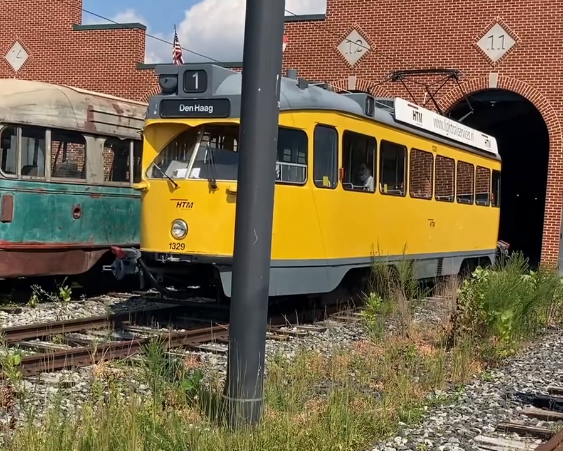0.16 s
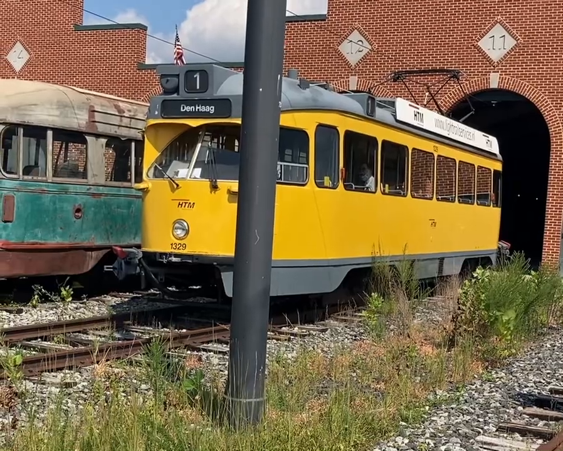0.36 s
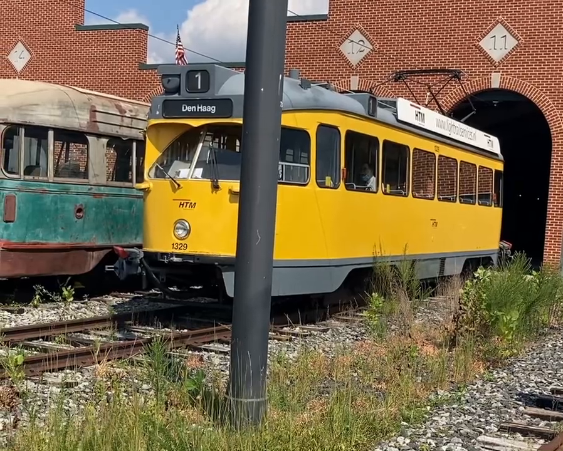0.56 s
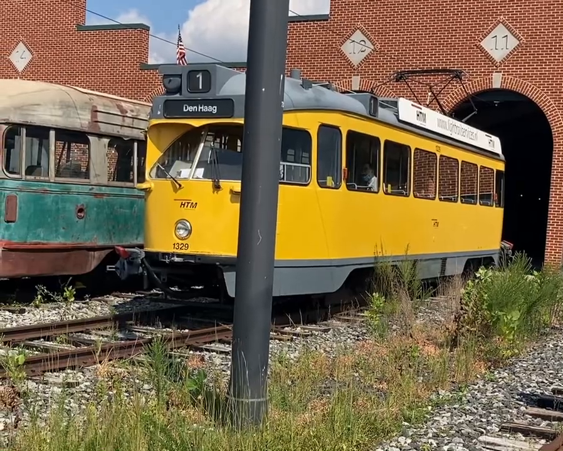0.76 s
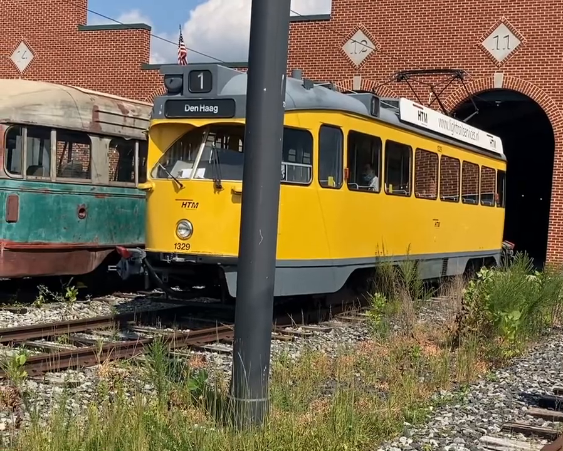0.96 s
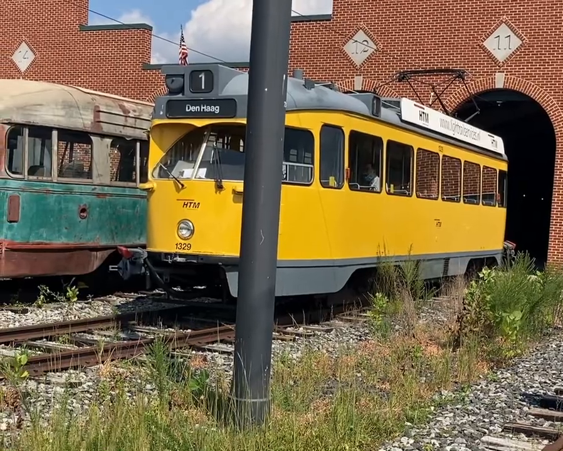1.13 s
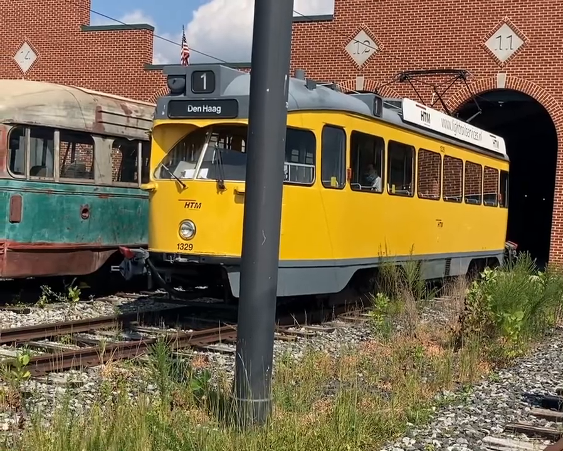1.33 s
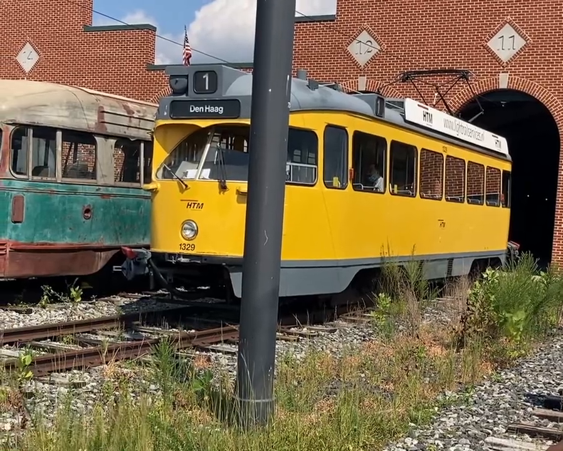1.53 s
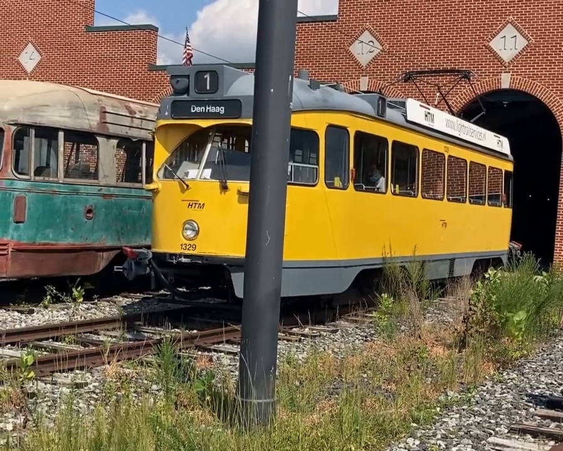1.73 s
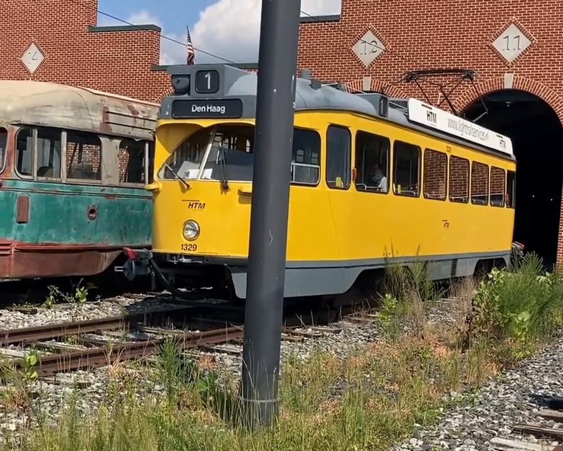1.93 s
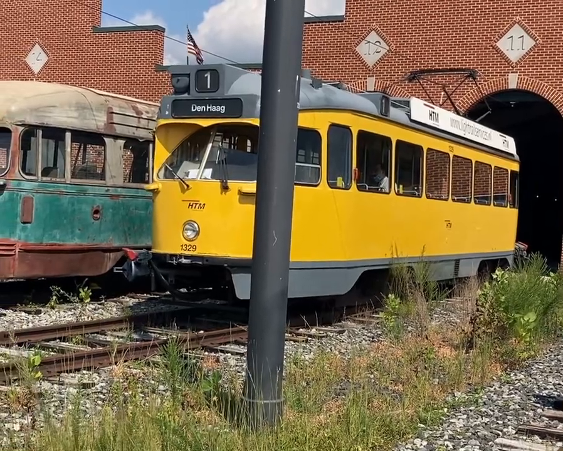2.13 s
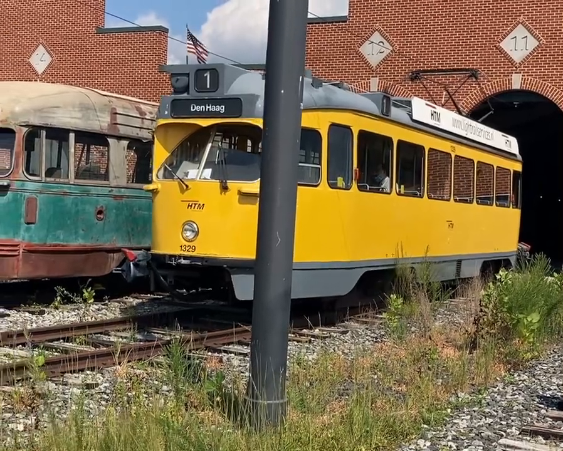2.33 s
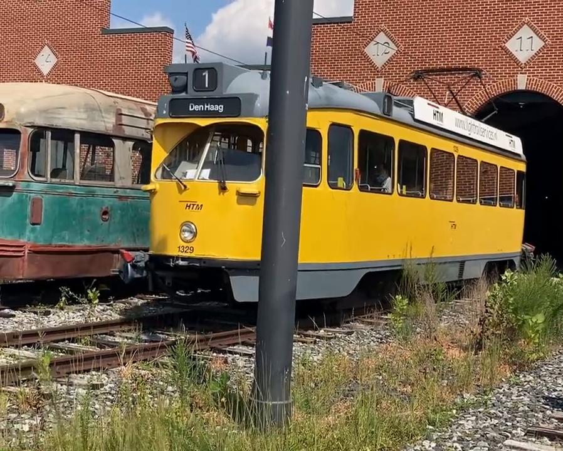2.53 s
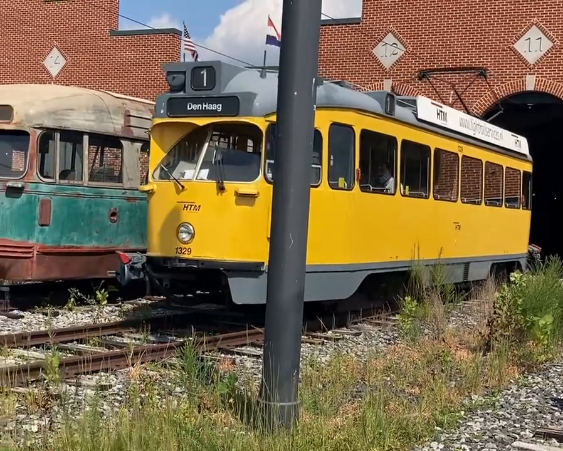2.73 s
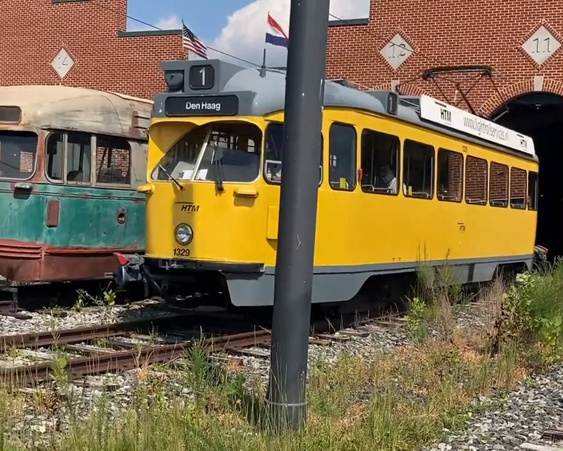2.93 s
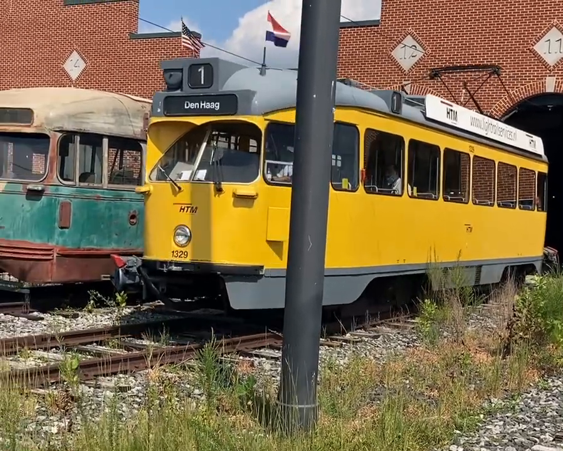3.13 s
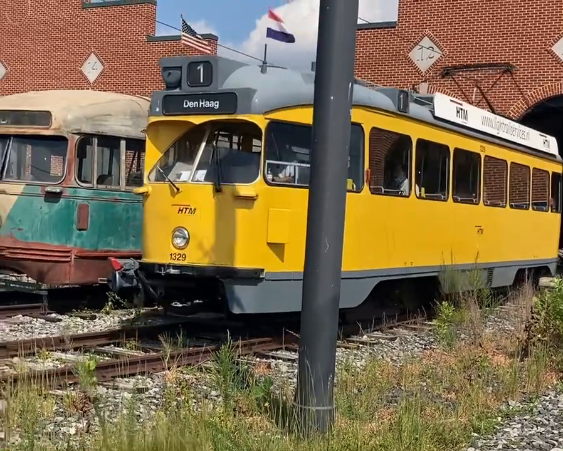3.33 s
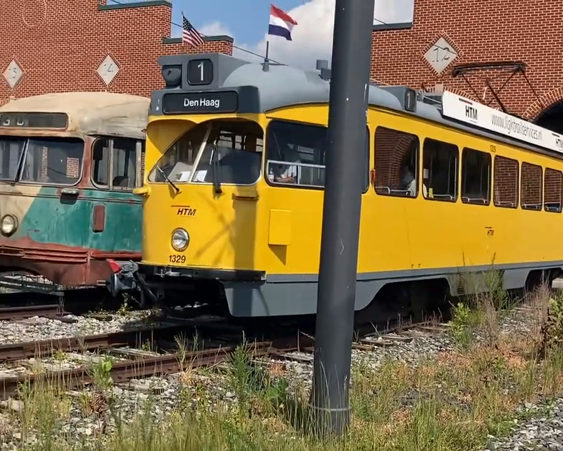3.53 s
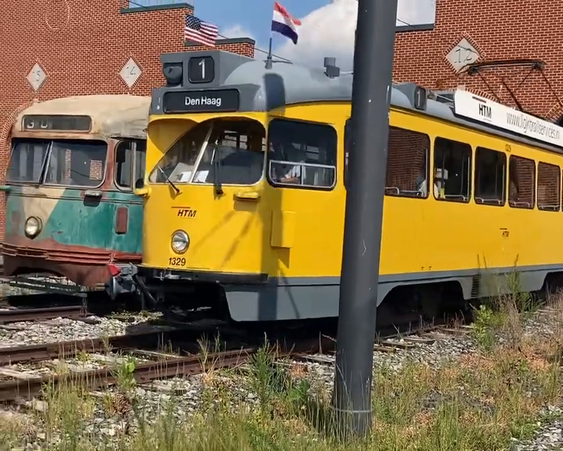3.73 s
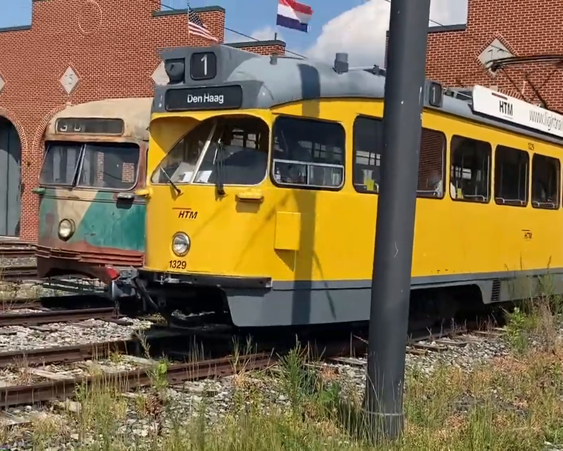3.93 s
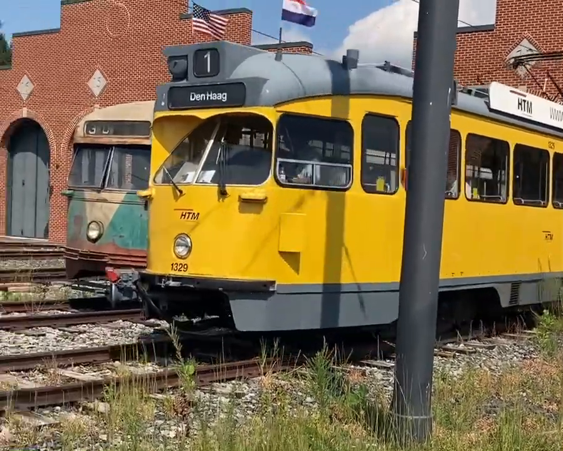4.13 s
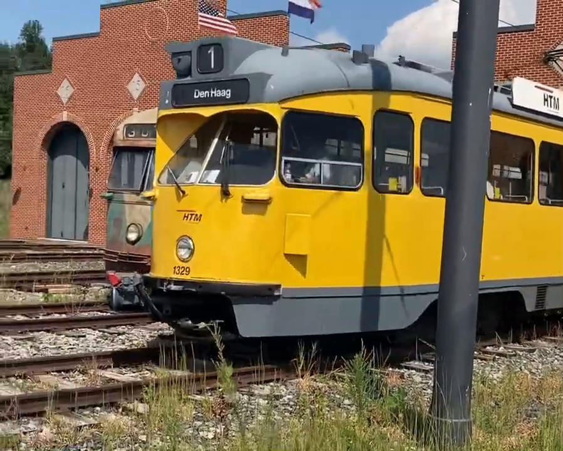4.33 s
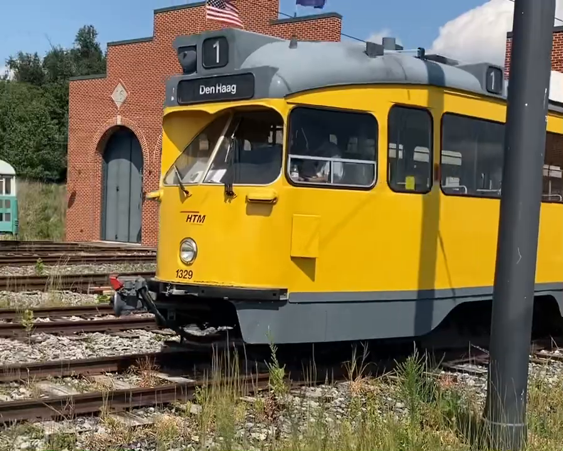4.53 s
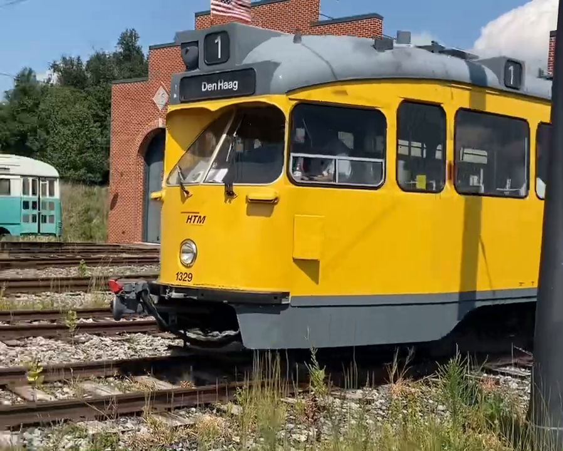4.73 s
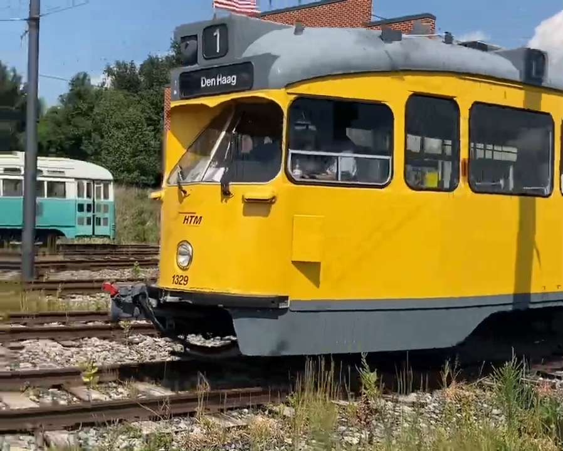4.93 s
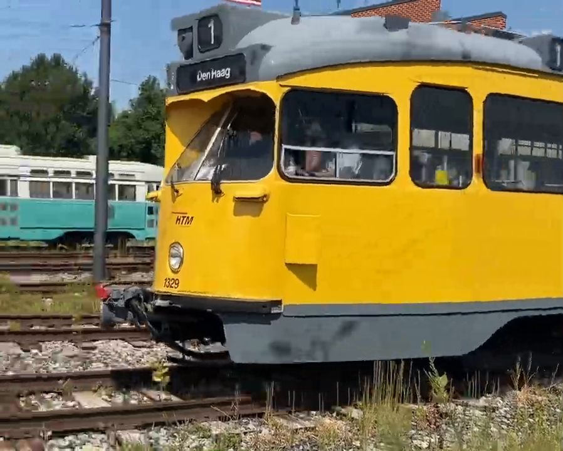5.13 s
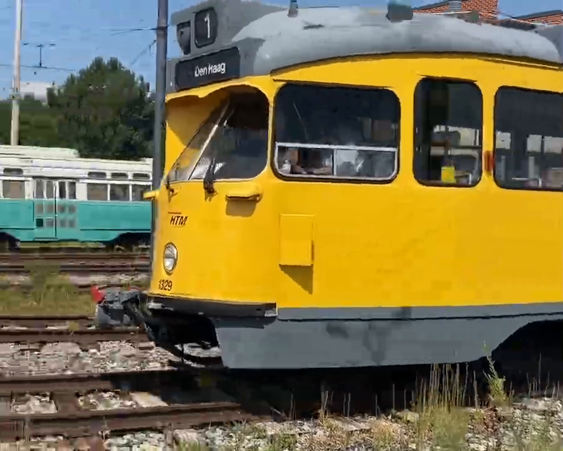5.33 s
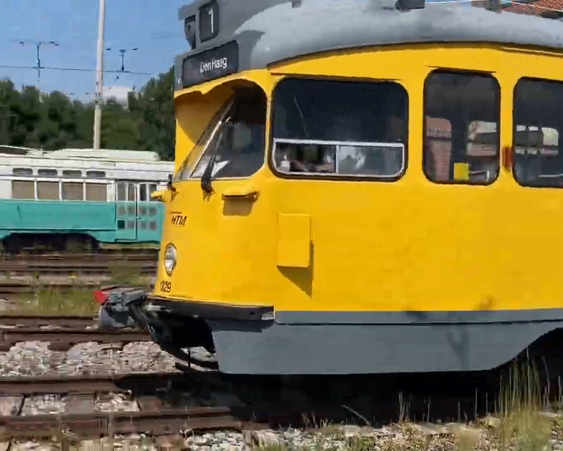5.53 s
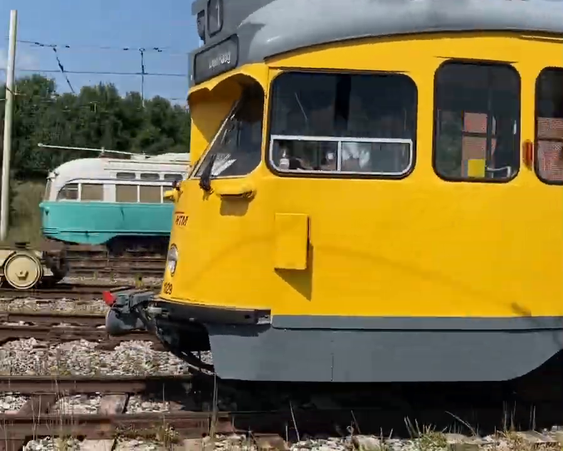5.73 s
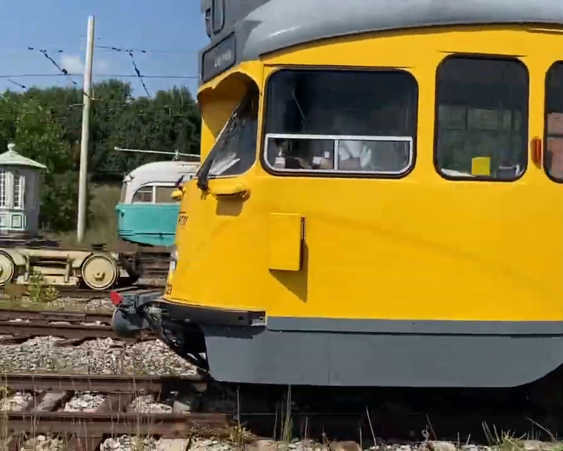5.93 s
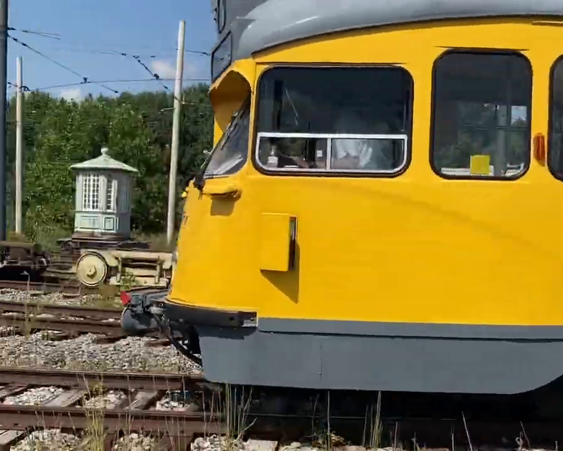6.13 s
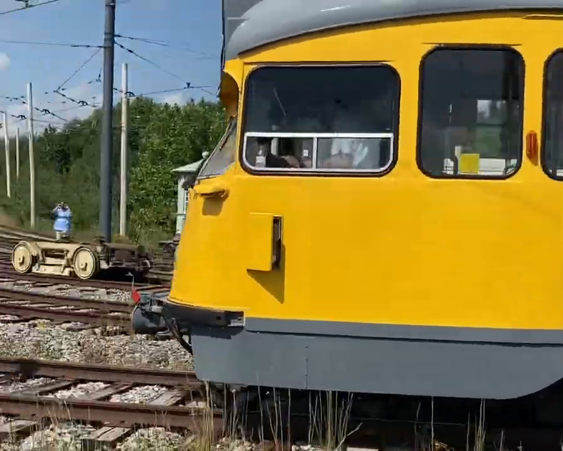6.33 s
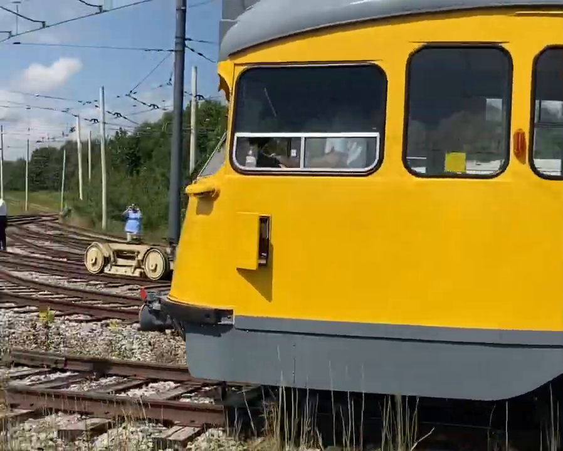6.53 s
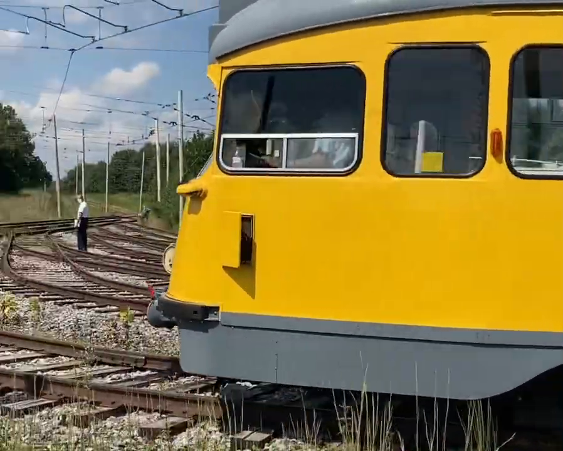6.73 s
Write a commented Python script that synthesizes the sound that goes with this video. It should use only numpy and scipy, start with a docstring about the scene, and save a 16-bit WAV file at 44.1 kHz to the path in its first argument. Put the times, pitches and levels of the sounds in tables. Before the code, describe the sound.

A streetcar's gong, just struck, rings away over distant traffic, insects and faint small birds in an open yard. The car's low rumble grows as it nears the trackside microphone, with thuds, clanks over rail joints and light ticks from the overhead wire. Close by, a wheel groans and rasps on the curve, then hums. Light wind buffets the microphone, and a thin, very high squeal rises at the end.

```python
"""A streetcar leaves its brick depot and rolls past close to the microphone, its gong dying away.
Rough wheels rumble, knock over rail joints and groan once on the curve as a flange sticks and slips;
the trucks thud, the pole ticks along the wire, a wheel hums and a thin squeal swells at the very end.
Far traffic, insects and small birds fill the yard. The microphone stands in the open, its two ports
giving the width and catching the wind."""
import sys
import numpy as np
from scipy import signal
from scipy.fft import rfft, irfft, next_fast_len
from scipy.io import wavfile

SR = 44100
rng = np.random.default_rng(int(sys.argv[2]) if len(sys.argv) > 2 else 0)


def pcm_store(signal):
    """Save signal as 16-bit PCM."""
    levels = np.round(np.clip(np.atleast_2d(signal), -1, 1) * 32767)
    wavfile.write(sys.argv[1], SR, levels.astype(np.int16).T)


N = 298204
T = np.arange(N) / SR


def amp(db):
    """Decibels to gain."""
    return 10 ** (np.asarray(db) / 20)


def rms_one(x):
    """Scale to rms 1."""
    return x / np.sqrt(np.mean(x ** 2) + 1e-20)


def in_time(rows):
    """A curve's columns after time_s, one value a sample."""
    times, *columns = np.transpose(rows)
    return [np.interp(T, times, column) for column in columns]


def edges(rows):
    """10 ms fades: in at a curve's first row, out at its last."""
    return np.clip(np.minimum(T - rows[0][0], rows[-1][0] - T) / .01, 0, 1)


def drift(rate_hz):
    """Random wander of rms 1, mostly slower than rate_hz."""
    step = 40
    r = np.exp(-2 * np.pi * rate_hz * step / SR)
    slow = signal.lfilter([1], [1, -2 * r, r * r], rng.standard_normal(N // step + 2002))[2000:]
    return np.interp(np.arange(N) / step, np.arange(len(slow)), rms_one(slow))


def band(x, low_hz, high_hz):
    """Band-pass."""
    return signal.sosfilt(signal.butter(2, [low_hz, high_hz], "band", fs=SR, output="sos"), x)


def resonate(x, modes):
    """A body's modes: parallel resonances of alternating sign."""
    out = 0
    for k, (hz, width_hz, db) in enumerate(modes):
        r = np.exp(-np.pi * width_hz / SR)
        poles = [1, -2 * r * np.cos(2 * np.pi * hz / SR), r * r]
        out = out + (-1) ** k * amp(db) * signal.lfilter([(1 - r * r) / 2, 0, (r * r - 1) / 2], poles, x)
    return out


def coloured(spectrum, flicker_db):
    """Two unrelated noises of one colour, rms 1; each octave flickers, partly on its own."""
    hz = np.maximum(np.arange(N // 2 + 1) * SR / N, 1)
    knots_hz, db = np.transpose(spectrum)
    shape = amp(np.interp(np.log(hz), np.log(knots_hz), db, left=-70, right=-90))
    noise = rfft(rng.standard_normal((2, N))) * shape
    together, out = drift(7.4), 0
    for centre_hz in 2. ** np.arange(np.floor(np.log2(knots_hz[0])), np.log2(knots_hz[-1]) + 1):
        share = np.clip(1 - abs(np.log2(hz / centre_hz)), 0, 1)
        out = out + irfft(noise * share, N) * amp(flicker_db * (0.42 * together + drift(10.8)))
    return rms_one(out)


def bursts(times, dbs, lengths, rise_s):
    """Envelope of blows: a quick rise, then 20 dB down per length."""
    out, t = np.zeros(N), T[:int(SR * .5)]
    for start_s, db, length_s in zip(times, dbs, lengths):
        shape = (1 - np.exp(-t / rise_s)) * amp(-20 * t / max(length_s, .002))
        i = int(start_s * SR)
        out[i:i + len(t)] += (amp(db) * shape / shape.max())[:N - i]
    return out


def struck(modes, times, dbs, lengths, blow_db=27, contact_hz=6000):
    """A blow and its weaker rattle ring a body's modes; soft contact dulls the top."""
    rattle = rng.standard_normal(N)
    steady_rms = np.sqrt(np.mean(resonate(rattle, modes) ** 2))
    force = rattle * bursts(times, dbs, lengths, rise_s=.001)
    force[((times + .002) * SR).astype(int)] += amp(dbs + blow_db)
    softened = signal.sosfilt(signal.butter(2, contact_hz, fs=SR, output="sos"), force + 1e-18)
    return resonate(softened, modes) / steady_rms


def scattered(x, spread_s):
    """The direct sound and what walls and ballast scatter back."""
    t = T[:int(SR * .15)]
    tail = rng.standard_normal(len(t)) * np.exp(-t / spread_s)
    return np.array([x, signal.fftconvolve(x, tail / np.sqrt(np.sum(tail ** 2)))[:N]])


def ports(pair, response):
    """Direct and scattered sound reach left and right, with a lead and balance at each frequency."""
    size = next_fast_len(N + SR // 4)
    hz = np.arange(size // 2 + 1) * SR / size
    knots_hz, *columns = np.transpose(response)
    lead_rad, pan_db, likeness = [np.interp(hz, knots_hz, column) for column in columns]
    likeness = np.clip(likeness, 0, 1)
    direct, diffuse = rfft(pair, size)
    shared = np.sqrt((1 + likeness) / 2) * direct
    opposed = np.sqrt((1 - likeness) / 2) * diffuse
    turn = amp(pan_db / 2) * np.exp(-.5j * lead_rad)
    return irfft([(shared + opposed) * turn, (shared - opposed) / turn], size)[:, :N]


# The rumble as the car nears the microphone: time_s, level_db
APPROACH = [(0, -41.5), (1.2, -41.5), (2.8, -43), (3.4, -38), (3.76, -36.5), (3.95, -32.5), (4.35, -33.5),
            (4.7, -28.5), (5.35, -26.5), (5.6, -22.5), (5.97, -28.5), (6.2, -23), (6.76, -20.5)]
# Colours of truck rumble, rail ring and rolling hiss: frequency_hz, density_db
RUMBLE_SPECTRUM = [(25, -43.5), (45, -16), (65, 1.5), (110, 0), (180, 1.5), (280, -0.5), (400, -8),
                   (560, -18.5), (800, -26)]
RAIL_SPECTRUM = [(350, -30), (500, -2.5), (640, -7.5), (880, 0.5), (1100, -3), (1400, -5.5), (2200, -22.5),
                 (3500, -27), (5000, -41.5)]
HISS_SPECTRUM = [(2000, 5.5), (3500, -4.5), (6000, -3), (8500, -5.5), (12000, -8), (16000, -16)]


def rolling(abreast_db=-21, far_hiss_db=-61.5, near_hiss_db=-59, far_cutoff_hz=13000):
    """Rough wheels on rough rail shake the trucks, ring the rail and hiss; distance dulls the hiss."""
    rumble_db, = in_time(APPROACH)
    swell_db = rumble_db - abreast_db
    rail_db = -36 + 0.93 * swell_db
    hiss_db = -49 + 0.66 * swell_db
    rumble = amp(rumble_db) * coloured(RUMBLE_SPECTRUM, flicker_db=1.6)
    rail = amp(rail_db) * coloured(RAIL_SPECTRUM, flicker_db=1.5)
    hiss = coloured(HISS_SPECTRUM, flicker_db=2.2)
    dull = signal.sosfiltfilt(signal.butter(4, far_cutoff_hz, fs=SR, output="sos"), hiss)
    nearness = np.clip((hiss_db - far_hiss_db) / (near_hiss_db - far_hiss_db), .15, 1)
    return rumble + rail + amp(hiss_db) * (dull + nearness * (hiss - dull))


# The gong's modes at the microphone:
# pitch_hz, level_db, t60_s, beat_hz, first_swell_s, beat_depth, right_lead_rad, left_over_right_db
GONG_MODES = [(708, -41, 7.8, 1.4, 0.19, 0.24, -1, -5.5), (1228, -39, 4, 2.88, 0.0077, 0.4, 1.5, -2.5),
              (1840, -42.5, 2.3, 0.36, .05, .3, -2.5, -1), (2475, -52, 2.2, 0.63, 0.1, .4, -2, 1),
              (3204, -41, 1.06, 4.2, 0.14, 0.36, 1.47, 0), (4100, -64, 0.55, .5, .05, .4, 6, -9),
              (4808, -48.5, 0.79, 12, 0.069, 0.49, 5.5, 0), (5500, -60, .4, .5, .02, .4, 4, 2),
              (6476, -56, 0.4, .5, .02, .4, 1, 0), (6560, -53, 0.4, .5, .02, .4, 5, 0),
              (7600, -53, 0.55, .5, .02, .4, -1, 0), (8393, -60, .5, .5, .02, .4, -1, 0),
              (8800, -59, 0.5, .5, .02, .4, -7, 0), (9448, -60, .3, .5, .02, .4, -1.5, 0),
              (9860, -55, 0.2, .5, .02, .4, -1.5, -2), (10500, -67, .4, .5, .02, .4, -2, 0),
              (12400, -74, .4, .5, .02, .4, -1, 0), (13500, -73, 0.35, .5, .02, .4, -7, 0)]


def gong(length_s=3.0, flicker_db=1.5):
    """Struck a moment before, its close pairs of modes beat and fade; moving air makes them flicker."""
    out, t = np.zeros((2, N)), T[T < length_s]
    side = np.array([[1], [-1]])
    fade = 1 - (t / length_s) ** 4
    for hz, db, t60_s, beat_hz, swell_s, depth, lead_rad, pan_db in GONG_MODES:
        beating = 1 - depth + depth * np.cos(2 * np.pi * beat_hz * (t - swell_s))
        level = amp(db - 60 * t / t60_s + flicker_db * drift(22)[:len(t)]) * beating * fade
        phase = 2 * np.pi * (hz * t + rng.random()) - side * lead_rad / 2
        out[:, :len(t)] += amp(side * pan_db / 2) * level * np.sin(phase)
    return out


# The air of the depot yard: frequency_hz, density_db
YARD_SPECTRUM = [(25, -23), (45, -8), (65, 1.5), (110, -4), (180, -9), (280, -53), (400, -36.5),
                 (560, -25.5), (900, -16.5), (1400, -21.5), (2200, -31.5), (3500, -41), (5500, -40),
                 (8000, -43.5), (11000, -64.5), (15500, -101)]


def traffic_and_insects():
    """Far traffic and insects blend into a bed of noise."""
    return amp(-38) * coloured(YARD_SPECTRUM, flicker_db=1.0)


# Wind right on the microphone: peak_s, level_db
WIND_GUSTS = [(3.4, -57), (3.97, -53), (4.2, -43), (4.47, -41), (4.58, -46), (4.83, -44), (5.08, -45),
              (5.47, -38), (5.67, -35), (5.87, -34.5), (6.12, -40), (6.3, -30)]


def wind(breeze_db=-56, half_width_s=0.05):
    """A light breeze and short gusts buffet each port separately."""
    gusts = sum(amp(db) * np.exp(-.5 * ((T - peak_s) / half_width_s) ** 2) for peak_s, db in WIND_GUSTS)
    return (amp(breeze_db) + gusts) * rms_one(band(rng.standard_normal((2, N)), 35, 120))


# The pole on the wire overhead: start_s, peak_db, length_s
POLE_TICKS = [(1.07, -46.5, 0.074), (2.062, -66, 0.12), (2.204, -74, 0.04), (3.007, -70, 0.055),
              (3.11, -62, 0.057), (3.967, -54, 0.067), (4.216, -55.5, 0.1), (4.667, -28.5, 0.003),
              (5.303, -47.5, 0.034), (5.401, -37.5, 0.026), (5.448, -42.5, 0.027), (5.8875, -50, 0.035),
              (6.153, -44.5, 0.044), (6.2463, -54, 0.038), (6.44, -59, 0.045), (6.699, -43, 0.15)]


def ticks():
    """Bright bursts, sharp if short, swelling if long: the hiss of the gong's blow, then the pole."""
    gong_hiss = (0.0028, -47, 0.05)
    faint_ticks = [(when * T[-1], -65 + 2.5 * (2 * force - 1), .08) for when, force in rng.random((8, 2))]
    envelope = sum(bursts([start_s], [db], [length_s], rise_s=0.09 * length_s)
                   for start_s, db, length_s in POLE_TICKS + faint_ticks + [gong_hiss])
    return rms_one(band(rng.standard_normal(N), 2200, 12000)) * envelope


# Small birds around the yard: start_s, length_s, from_hz, to_hz, level_db
BIRD_CALLS = [(0.2, 0.18, 4150, 3450, -62), (0.384, 0.12, 9100, 7960, -66), (1.448, 0.17, 8900, 6100, -62),
              (1.88, 0.092, 9350, 9100, -71), (2.0, .18, 7400, 8050, -67), (2.612, .045, 5800, 6100, -58),
              (2.62, .13, 7650, 7500, -68), (2.657, 0.15, 6800, 6700, -69), (2.7, 0.22, 8250, 8050, -64),
              (2.76, .09, 6050, 5800, -67), (2.96, .07, 5900, 5950, -70), (3.1, 0.13, 7350, 7500, -65),
              (3.25, .04, 5900, 5600, -64), (3.34, .05, 5600, 5750, -65), (3.4, .18, 8100, 7800, -67)]


def birds(twitter_db=-72):
    """Thin gliding whistles over a faint busy twitter, all a little hoarse."""
    twitter = []
    for when, length, pitch, fall in rng.random((150, 4)):
        from_hz = 6800 + 2200 * pitch
        to_hz = from_hz - 500 * (fall - .3)
        twitter.append((0.15 + 4.2 * when, 0.033 + 0.092 * length, from_hz, to_hz, twitter_db))
    out, warble_hz = np.zeros(N), 110 * drift(74)
    for start_s, length_s, from_hz, to_hz, db in BIRD_CALLS + twitter:
        progress = np.linspace(0, 1, int(length_s * SR))
        span = int(start_s * SR) + np.arange(len(progress))
        hz = from_hz + (to_hz - from_hz) * progress + warble_hz[span]
        out[span] += amp(db) * np.sin(np.pi * progress) * np.sin(2 * np.pi * np.cumsum(hz) / SR)
    return out * amp(4.5 * drift(90))


# The trucks, louder as they come close: start_s, peak_db, pitch_hz, length_s
TRUCK_THUDS = [(1.118, -32, 146.7, 0.095), (2.456, -31.5, 277, 0.054), (2.53, -28, 296, 0.038),
               (3.888, -26.5, 172, 0.043), (3.92, -21.5, 343, 0.02), (3.935, -23.5, 285, 0.031),
               (4.037, -25, 196, 0.057), (4.137, -26.5, 252, 0.025), (4.459, -28, 251, 0.062),
               (4.747, -21.5, 281, 0.034), (4.858, -23.5, 270, 0.048), (4.894, -18, 248, 0.026),
               (4.96, -26, 267, 0.067), (5.141, -21, 269, 0.045), (5.427, -17.5, 205, 0.034),
               (5.526, -19, 249, 0.036), (5.592, -12, 276, 0.017), (5.601, -13.5, 179, 0.017),
               (6.22, -14.5, 278.2, 0.085), (6.308, -11.5, 187, 0.06), (6.552, -19.5, 220, 0.023),
               (6.681, -16, 171.6, 0.042)]


def thuds():
    """The truck frame makes a few damped swings in two modes."""
    out, t = np.zeros(N + SR), T[:int(SR * .4)]
    for start_s, db, hz, length_s in TRUCK_THUDS:
        upper_hz = hz * (1.3 + 0.223 * rng.uniform(-1.18, 1))
        swing = np.sin(2 * np.pi * hz * t) + 0.41 * np.sin(2 * np.pi * upper_hz * t)
        shape = (1 - np.exp(-t / 0.0024)) * amp(-20 * t / length_s)
        i = int(start_s * SR)
        out[i:i + len(t)] += amp(db) * swing * shape / shape.max()
    return out[:N]


# Wheels crossing rail joints: start_s, ring_db, clank_db, length_s
RAIL_JOINTS = [(2.283, -72, -46, .02), (3.7, -51, -43.5, 0.075), (3.71, -66, -42, 0.04),
               (3.903, -38.5, -37.5, 0.042), (3.918, -40, -39, 0.065), (4.746, -47, -34.5, 0.057),
               (4.8864, -62, -38, 0.028), (5.088, -63, -38, 0.03), (5.1315, -42.5, -32, 0.055),
               (5.3997, -39.5, -31.5, 0.063), (5.512, -36.5, -35.5, 0.056), (6.1425, -34.5, -30.5, 0.14),
               (6.7244, -36, -26, 0.045)]
# Modes of the wheel rim, and of rail and axle: pitch_hz, width_hz, gain_db
RIM_MODES = [(1570, 70, 6.5), (1855, 72, 4), (2147, 70, 5), (2500, 53, 8), (2930, 100, 2), (3506, 71, -2),
             (4370, 90, 0), (5000, 500, -14.5)]
CLANK_MODES = [(568, 75, 5.5), (796, 71, 4.5), (886, 60, 7.5), (960, 140, 3), (1317, 170, -0.5)]


def joints():
    """Each joint rings the wheel rim and clanks in rail and axle."""
    times, ring_db, clank_db, lengths = np.transpose(RAIL_JOINTS)
    return struck(RIM_MODES, times, ring_db, lengths) + struck(CLANK_MODES, times, clank_db, lengths)


# The flange on the curve, close by: time_s, first_partial_db, second_partial_db
GROAN_LEVELS = [(5.47, -45, -56), (5.505, -32.5, -27.5), (5.528, -28, -24.5), (5.54, -32.5, -38),
                (5.57, -42, -55), (5.77, -36.5, -52), (5.8, -34, -33.5), (5.87, -20, -28.5),
                (5.9, -13.5, -22), (5.94, -12.5, -27.5), (5.954, -18.5, -31), (6.023, -17.5, -19.5),
                (6.055, -17, -33.5), (6.085, -37, -18.5), (6.11, -25.5, -36.5), (6.188, -27.5, -20),
                (6.25, -34, -52)]
# Its pitches: time_s, slip_rate_hz, second_partial_hz
GROAN_PITCHES = [(5.78, 493.3, 997.0), (5.814, 492.7, 1002), (5.856, 489.1, 986.8), (5.97, 488.2, 978.1),
                 (6.052, 491.9, 999.9), (6.166, 496.7, 988.9), (6.25, 493.9, 984.9)]
# Its rasp, one curve for each grip: time_s, low_db, middle_db, high_db
FLANGE_GRIPS = [
    [(5.47, -62.5, -62, -57), (5.496, -41, -51, -54), (5.508, -24, -43, -47), (5.518, -28.5, -49, -50),
     (5.53, -32, -41, -50), (5.544, -34.5, -64, -65), (5.57, -44.5, -60, -67)],
    [(5.76, -46.5, -59, -54), (5.78, -38, -50, -50.5), (5.8, -30.5, -35.5, -38.5), (5.926, -29, -35, -45.5),
     (6.014, -33.5, -33.5, -47), (6.066, -28.5, -46, -45), (6.078, -31.5, -33, -36.5),
     (6.12, -25, -45.5, -49.5), (6.162, -28.5, -40, -38), (6.216, -38, -47.5, -55), (6.26, -57, -47, -60)],
]
# The wheel's modes in those three ranges: pitch_hz, width_hz, gain_db
LOW_MODES = [(885, 36, 8.5), (1104, 54, 7), (1406, 71, 9.5), (1479, 40, 9.5), (1595, 37, 8.5)]
MIDDLE_MODES = [(1985, 42, 3), (2200, 200, -11), (2475, 50, 2), (2600, 80, -8)]
HIGH_MODES = [(3000, 85, 5), (3250, 200, -5), (3480, 60, -1), (3590, 45, 3), (4010, 45, -8),
              (4800, 900, -13)]


def groan():
    """The flange sticks and slips: two strong partials, and uneven slips that rasp in the wheel's modes."""
    first_db, second_db = in_time(GROAN_LEVELS)
    slip_cycles, second_cycles = np.cumsum(in_time(GROAN_PITCHES), axis=1) / SR
    tone = amp(first_db + 2.0 * drift(90)) * np.cos(2 * np.pi * slip_cycles + .2 * drift(40))
    tone += amp(second_db + 1.8 * drift(90)) * np.cos(2 * np.pi * second_cycles + .3 * drift(40))
    slips = np.diff(np.floor(slip_cycles + 0.045 * drift(150)), prepend=0)  # one pulse a cycle
    friction = slips * amp(3.5 * rng.standard_normal(N)) + .12 * rng.standard_normal(N)
    ringing = [rms_one(resonate(friction, modes)) * amp(2.5 * drift(40))
               for modes in (LOW_MODES, MIDDLE_MODES, HIGH_MODES)]
    rasp = sum(edges(grip) * np.sum(amp(in_time(grip)) * ringing, axis=0) for grip in FLANGE_GRIPS)
    return np.sqrt(2) * edges(GROAN_LEVELS) * tone + rasp


# The wheel humming abreast of the microphone: time_s, level_db
HUM_LEVELS = [(6.12, -36.5), (6.25, -28.5), (6.32, -37.5), (6.39, -29), (6.46, -22.5), (6.52, -31),
              (6.58, -29.5), (6.76, -38)]


def hum(pitch_hz=486, width_hz=26):
    """Rolling roughness keeps the wheel's lowest mode waxing and waning after the groan."""
    mode = [(pitch_hz, width_hz, 0)]
    level_db, = in_time(HUM_LEVELS)
    ringing = resonate(resonate(rng.standard_normal(N), mode), mode)
    return amp(level_db) * (T > HUM_LEVELS[0][0]) * rms_one(ringing)


def squeal(pitch_hz=15410, end_db=-41, rise_db_per_s=250):
    """A thin, flickering near-sine swells at the very end."""
    level_db = end_db + rise_db_per_s * (T - T[-1]) + 3.0 * drift(40)
    return amp(level_db) * np.sin(2 * np.pi * pitch_hz * T + .5 * drift(60))


# Left and right in the treble; in some bands both sides match almost exactly: frequency_hz, right_lead_rad, #
# likeness
TREBLE_STEREO = [(2760, 3.0, .93), (3100, 3.6, .9), (3700, 5.0, .7), (4300, 4.3, .7), (5200, 3.25, .94),
                 (5750, 3.0, .94), (7450, 1.0, .8), (7750, .05, .995), (8950, -.05, .995), (9600, -1.0, .75),
                 (10800, -2.5, .75), (11050, -3.12, .999), (12400, -3.16, .999), (13700, -5.3, .7),
                 (14000, -6.2, .99), (16000, -6.28, .99)]
# Left and right for sound from track and yard: frequency_hz, right_lead_rad, left_over_right_db, likeness
TOWARD_TRACK = [(20, 0, -0.5, 1.0), (201, 0.01, 0, 1.0), (458, 0.87, 2.0, 1.0), (644, 3.5, -3.5, 0.44),
                (800, 5.0, -6.5, 0.19), (1070, 7.5, -4.0, 1.0), (1120, 6.0, 0.5, 0.78),
                (1464, 8.0, -2.5, 0.38), (1744, 13.0, -4.0, 0.05), (1940, 13.5, -2.0, 0.15),
                (2164, 10.0, -5.0, 0.94), (2260, 13.5, 2.5, 0.83),
                (2660, 15.0, -6.5, 0.2)] + [(hz, lead + 4 * np.pi, 0, alike) for hz, lead, alike in TREBLE_STEREO]
TOWARD_YARD = [(20, -1.15, 0.48, .999), (200, -0.03, -0.57, 1.0), (340, -1.5, 1.5, 0.8),
               (520, 1.0, 2, 0.21), (696, 0.4, 1.5, 0.5), (910, -1.3, 0.92, 0.16), (1240, 1.0, 1.2, 1.0),
               (1540, 0.84, -0.66, 0.69), (1990, -1.4, -0.76, 0.36),
               (2310, 0.9, -1.8, .25)] + [(hz, lead, 0, alike) for hz, lead, alike in TREBLE_STEREO]


def scene():
    """From the trackside, car and yard lie in different directions; held tones arrive mostly direct."""
    car = rolling() + scattered(joints() + thuds() + ticks(), spread_s=0.0025)
    car += scattered(groan() + hum() + squeal(), spread_s=0.033) * amp([[0], [-12]])
    yard = traffic_and_insects() + scattered(birds(), spread_s=0.04)
    return ports(car, TOWARD_TRACK) + ports(yard, TOWARD_YARD) + gong() + wind()


def record(dry):
    """A steep low-pass cuts the highest treble."""
    stop_db, stop_hz = 70, 16300
    return signal.sosfilt(signal.cheby2(14, stop_db, stop_hz, fs=SR, output="sos"), dry)


dry = scene()
out = record(dry)
pcm_store(out)
```